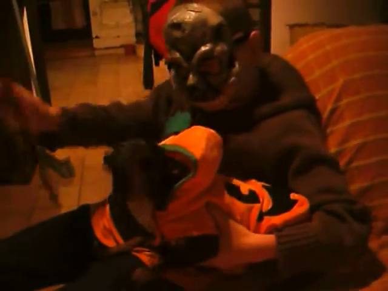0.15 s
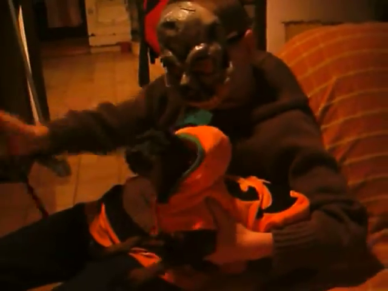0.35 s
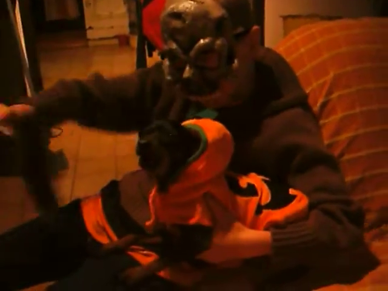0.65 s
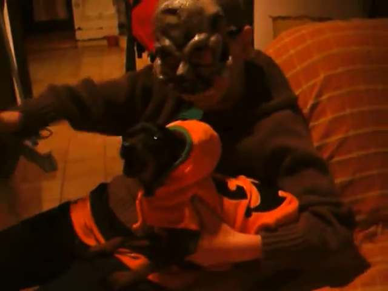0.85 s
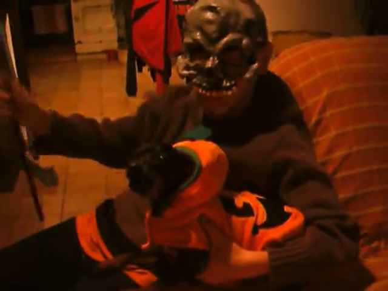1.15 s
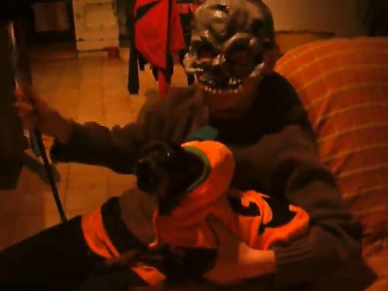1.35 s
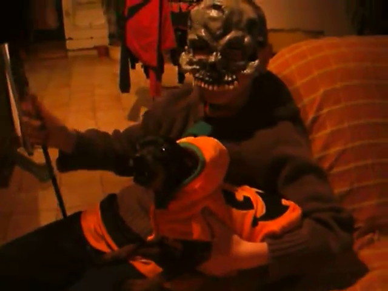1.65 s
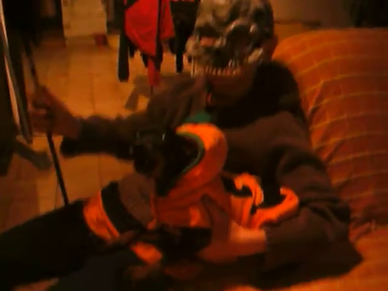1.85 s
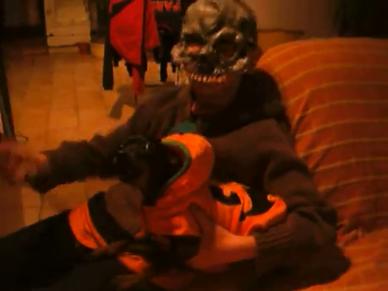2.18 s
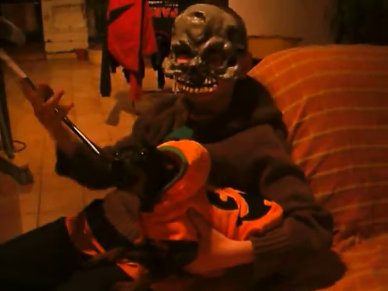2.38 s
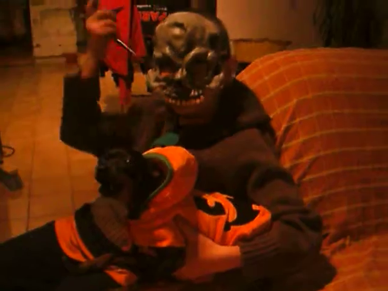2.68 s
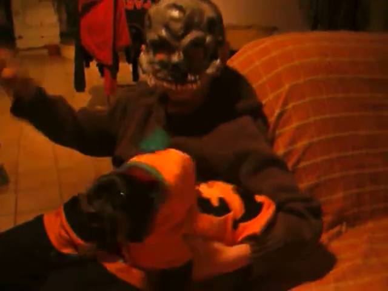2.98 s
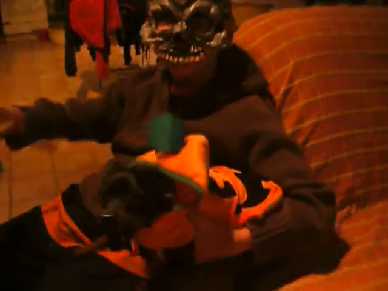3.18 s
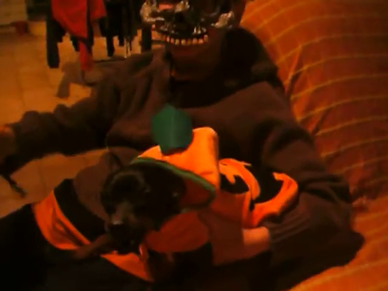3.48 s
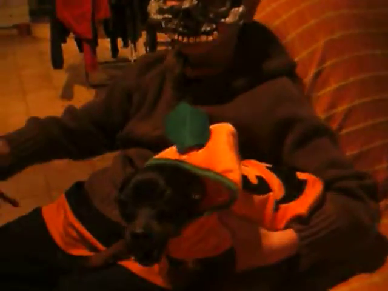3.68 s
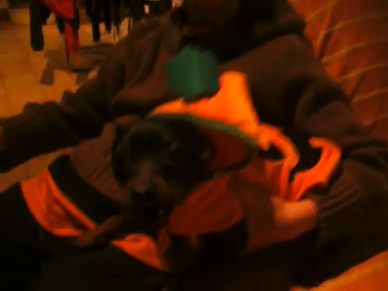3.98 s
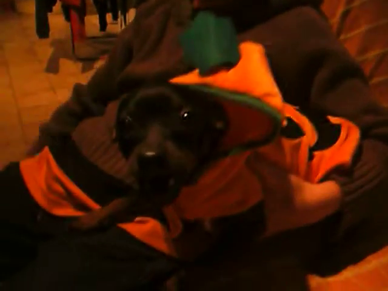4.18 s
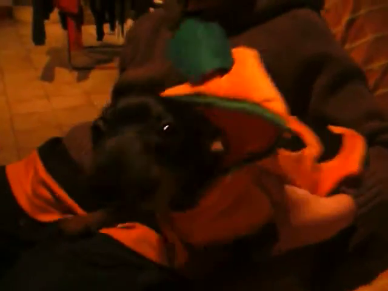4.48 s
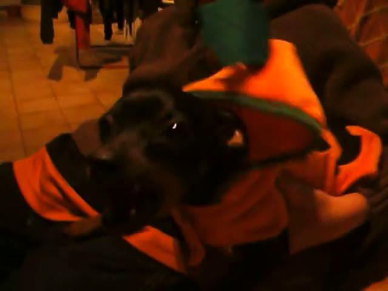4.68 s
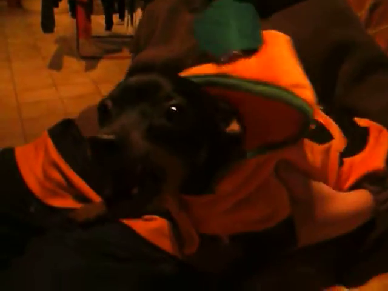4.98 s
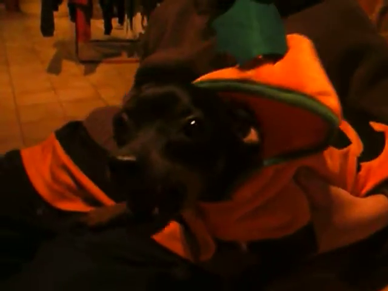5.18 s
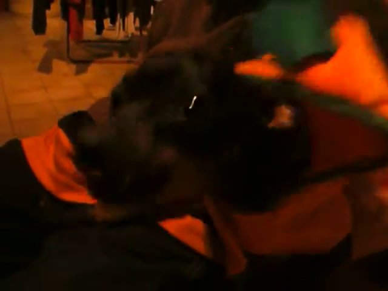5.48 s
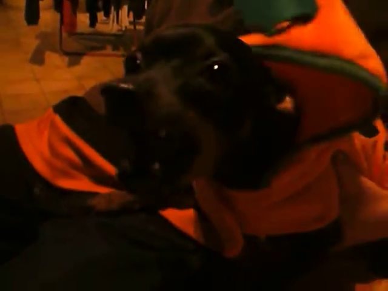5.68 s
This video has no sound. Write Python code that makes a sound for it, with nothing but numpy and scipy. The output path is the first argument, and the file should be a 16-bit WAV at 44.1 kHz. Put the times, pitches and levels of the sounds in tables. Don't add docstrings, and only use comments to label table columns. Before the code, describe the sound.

A small dog barks hoarsely, growls in long throbbing stretches and snarls on the in-breath, close and overdriven, in a hard tiled room with steady hiss.

```python
import sys
import numpy as np
from scipy import signal
from scipy.fft import rfft, irfft
from scipy.io import wavfile
from scipy.ndimage import uniform_filter1d

SR = 44100
rng = np.random.default_rng(int(sys.argv[2]) if len(sys.argv) > 2 else 0)


def nominal_scale(level):
    x = np.asarray(level, float) / 20
    return 10 ** x


def generate_wav(sig):
    pcm = np.round(np.clip(np.atleast_2d(sig).T, -1, 1) * 32767).astype(np.int16)
    wavfile.write(sys.argv[1], SR, pcm)


N = 257536
RATE = 8000


def evened(x):
    return x / np.sqrt(np.mean(x ** 2) + 1e-20)


def read(points, hz):
    f, value = np.transpose(points)
    return np.interp(np.log(hz + 1), np.log(f + 1), value)


# frequency in Hz, density in dB per Hz.
HUSH_SPECTRUM = [(59, -44), (100, -14), (141, -16), (721, -3), (2030, -3), (3740, -6), (4240, -15),
                 (5510, -45), (9330, -120)]


def hush(count):
    z = rfft(rng.standard_normal(count))
    shaped = irfft(z * nominal_scale(read(HUSH_SPECTRUM, np.fft.rfftfreq(count, 1 / RATE))), count)
    return nominal_scale(-18) * evened(shaped)


# time in seconds, frequency in Hz.
FOLD_RATE = [(0, 289.8), (.8, 238), (1.3, 244.4), (1.9, 262.2), (2.2, 295), (2.42, 289.7), (2.6, 250.9),
             (2.9, 261.5), (3.05, 294.5), (3.47, 294.9), (3.55, 245), (4.4, 240), (4.65, 215.1),
             (5.3, 214.8), (5.84, 230.5)]


def fold_rate(t):
    return np.interp(t, *np.transpose(FOLD_RATE))


def folds(count, hz, jitter, rough):
    wobble = evened(uniform_filter1d(rng.standard_normal(count), size=40))
    turns = np.cumsum(hz * (1 + jitter * wobble).clip(.2)) / RATE
    pulses = np.diff(np.floor(turns), prepend=0) * nominal_scale(3.0 * rng.standard_normal(count))
    puffs = (.35 + np.exp(-(turns % 1) / 0.27)) * rng.standard_normal(count)
    rough = np.clip(rough, 0, 1)
    return np.sqrt(1 - rough) * evened(pulses) + np.sqrt(rough) * evened(puffs)


def resonate(x, hz, width):
    turn = np.exp(2j * np.pi * np.cumsum(hz * np.ones(len(x))) / RATE)
    r = np.exp(-np.pi * 1.55 * width / RATE)
    smoothed = signal.lfilter([1], [1, -2 * r, r * r], x / turn)
    return evened((turn * smoothed).real)


def steadied(x, share):
    size = uniform_filter1d(abs(signal.hilbert(x)), size=24) + 0.17
    return evened(x / size ** np.clip(share, 0, 1))


# start in seconds, end in seconds, extra effort in dB.
BARK_PUSHES = [
    (0.085, 0.207, 8),
    (0.768, 0.837, 8.5),
    (2.802, 2.917, 5.5),
    (3.548, 3.63, 9.5),
    (4.354, 4.466, 5),
    (4.644, 4.714, 2.5),
    (5.327, 5.444, 9),
    (5.614, 5.682, 2.5),
]


def push(t, rise, fall):
    total = 0
    for start, end, db in BARK_PUSHES:
        total = total + db * np.clip((t - start) / rise, 0, 1) * np.clip((end - t) / fall + .5, 0, 1)
    return total


# time in seconds, swell in dB.
SWELLS = [(0.87, -2.7), (0.914, 0.7), (0.942, -1.2), (0.969, 3.5), (0.993, 2.5), (1.011, 2), (1.045, 2.5),
          (1.078, 4.0), (1.119, 4.5), (1.164, 4), (1.195, 1.5), (1.231, 2), (1.277, 0), (1.31, 1),
          (1.347, 2.5), (1.443, 7), (1.476, 2.5), (1.554, 3), (1.596, 4), (1.635, 3.5), (1.656, 5),
          (1.676, 1), (1.706, 4.5), (1.783, 5.5), (1.811, 2.7), (1.842, 3.5), (1.881, 0.3), (1.908, -0.2),
          (1.96, 5), (2.031, 5.5), (2.099, 2.5), (2.16, 0), (2.213, 1), (2.231, 3.0), (2.257, 1.5),
          (2.31, 3.0), (2.343, 2.5), (2.383, 3.5), (2.403, -1), (2.468, 3.5), (2.569, -2), (2.588, 3.0),
          (2.651, -1), (2.693, -7.1), (2.767, 0.5), (3.112, -0.5), (3.148, 2), (3.212, 1.5), (3.237, -0.2),
          (3.277, 2.5), (3.325, 3.0), (3.367, -9), (3.521, 4.5), (3.683, 6), (3.759, 0.9), (3.795, 4),
          (3.87, 4.5), (3.905, -0.5), (4.01, 4), (4.03, 1), (4.062, 4.5), (4.08, 0), (4.098, 1), (4.142, 3),
          (4.24, 2.1), (4.29, 2.5), (4.331, 2.4), (4.791, 0), (4.838, 2), (4.888, 2.5), (4.927, 3.5),
          (4.982, 0), (5.014, 2.5), (5.053, 1), (5.071, 2.5), (5.113, 1.5), (5.169, 3.5), (5.196, 4),
          (5.22, 3.5), (5.764, 0), (5.782, 3.0), (5.802, 1.8)]
# time in seconds, depth in dB.
SHUTS = [(0.928, 10.5), (1.027, 11), (1.06, 8.5), (1.103, 11), (1.137, 6), (1.218, 4), (1.254, 10),
         (1.333, 11.5), (1.421, 4), (1.544, 4.5), (1.568, 5.5), (1.623, 8.5), (1.684, 9), (1.752, 3),
         (1.795, 10), (1.828, 6), (1.929, 3.5), (2.045, 6.5), (2.146, 9), (2.197, 6.5), (2.37, 6),
         (2.422, 2.5), (2.535, 7), (2.6, 9), (2.669, 0), (2.705, 9.5), (2.779, 8), (3.191, 9.5), (3.251, 8),
         (3.535, 13), (3.736, 6.5), (3.77, 5), (3.852, 6), (3.93, 7.5), (3.996, 6), (4.127, 10),
         (4.194, 6.5), (4.266, 8), (4.31, 8), (5.133, 5.5)]


def palate(t, dip_db, width, shut_width):
    s, swell_db = np.transpose(SWELLS)
    swells = (swell_db + dip_db) * np.exp(-((t[:, None] - s) / width) ** 2 / 2)
    s, depth_db = np.transpose(SHUTS)
    notches = 1.3 * depth_db * np.exp(-((t[:, None] - s) / shut_width) ** 2 / 2)
    return swells.max(axis=1) - dip_db - notches.max(axis=1)


def voice(rows, modes, fixed, chest_db, jitter, rough, steady, dip_db, spill_db, usual_db):
    s, effort_db, *throat, upper_db = np.transpose(rows)
    t = np.arange(s[0], s[-1], 1 / RATE)
    hz = fold_rate(t)
    pushed = push(t, rise=.004, fall=0.042)
    drive = folds(len(t), hz, jitter, rough)
    upper = nominal_scale(np.interp(t, s, upper_db) - usual_db)
    moving = [nominal_scale(db) * resonate(drive, np.interp(t, s, f), w) for f, (w, db) in zip(throat, modes)]
    still = sum(nominal_scale(db) * resonate(drive, f, w) * (upper if f > 1500 else 1) for f, w, db in fixed)
    chest = sum(nominal_scale(db) * resonate(drive, (k + 1) * hz, 32 * np.sqrt(k + 1))
                for k, db in enumerate(chest_db))
    spill = nominal_scale(spill_db + 0.65 * pushed) * resonate(drive, 2200, 1700) * upper
    swell_db = palate(t, dip_db, width=.008, shut_width=0.0042) * (pushed < 1)
    sound = steadied(moving[0], steady) - upper * sum(moving[1:]) + still + spill + chest / nominal_scale(pushed)
    edge = np.clip(np.minimum((t - s[0]) / 0.0042, (s[-1] - t) / 0.017), 0, 1)
    return s[0], sound * nominal_scale(np.interp(t, s, effort_db) + pushed + swell_db) * edge


def add(mix, s, sound):
    part = mix[round(s * RATE):][:len(sound)]
    part += sound[:len(part)]


# time in seconds, effort in dB, throat resonances 1 and 2 in Hz,
# upper throat in dB.
SNARL_BREATHS = [
    [(0.0, -13.5, 1126, 2645, -5), (0.028, -18, 1104, 2730, -3), (0.07, -33.5, 1088, 2635, -23),
     (0.08, -2.5, 1116, 2590, -11.5)],
    [(0.52, -27, 969, 2480, -3), (0.544, -22, 943, 2430, -2.5), (0.558, -22, 957, 2470, -16),
     (0.575, -35, 963, 2520, -2.5)],
    [(3.056, -23.5, 1202, 2600, -1), (3.102, -16, 1201, 2510, -0.5), (3.178, -17, 1132, 2674, -3),
     (3.29, -17.5, 1191, 2632, -3), (3.396, -13, 1083, 2655, -3), (3.458, -28, 1073, 2680, 3),
     (3.475, -35, 1107, 2720, 2)],
    [(4.657, -14.5, 1216, 2570, 0), (4.667, -7, 1160, 2629, -1), (4.773, -16, 1143, 2514, -3.5),
     (5.087, -16, 1114, 2560, -4.5), (5.111, -12, 1122, 2510, -6), (5.133, -17, 1128, 2534, -3),
     (5.199, -15, 1163, 2556, -5), (5.285, -21.5, 1093, 2544, -8), (5.31, -52, 1113, 2520, -2)],
    [(5.612, -16.5, 1208, 2612, 0), (5.648, -8.5, 1204, 2608, -7), (5.736, -16, 1098, 2502, -3.5),
     (5.778, -11.5, 1101, 2600, -4.5), (5.84, -16.5, 1152, 2655, 1)],
]
# width in Hz, level in dB.
SNARL_THROAT = [(95, -15.5), (190, -2.5)]
# frequency in Hz, width in Hz, level in dB.
SNARL_STILL = [(700, 110, -18.5), (1574, 200, -16), (3091, 170, -12.5), (3490, 140, -10.5), (3830, 160, -3)]


def snarls(mix):
    for rows in SNARL_BREATHS:
        add(mix, *voice(rows, SNARL_THROAT, SNARL_STILL, chest_db=[-22, -28], jitter=0.28, rough=0.82,
                        steady=0.47, dip_db=2.0, spill_db=-12.5, usual_db=-1.5))


# frequency in Hz, 60 dB decay time in seconds.
ROOM_DECAY = [(200, 0.4), (600, 0.26), (1200, 0.56), (2000, 0.68), (3200, 0.45), (4400, 0.92)]


def room(x):
    taps = np.zeros(RATE)
    count = RATE // 4 - 11
    places = np.arange(40, RATE - 4, 4) + rng.integers(0, 4, count)
    taps[places] = rng.choice([-1., 1.], count)
    hz, t, z = signal.stft(taps, RATE, nperseg=64)
    decay = nominal_scale(-60 * t / read(ROOM_DECAY, hz)[:, None])
    tail = signal.istft(z * decay, RATE, nperseg=64)[1]
    return signal.fftconvolve(x, tail / np.linalg.norm(tail))[:len(x)]


# time in seconds, effort in dB,
# throat resonances 1 to 3 in Hz, upper throat in dB.
GROWL_BREATHS = [
    [(0.084, -6.5, 1098, 1942, 2907, -3), (0.124, -7.5, 1138, 1883, 2853, -5),
     (0.206, -14.5, 1053, 1910, 2843, -2), (0.225, -17, 1050, 1972, 2925, 0)],
    [(0.77, -12.5, 960, 1800, 2884, -6.5), (0.81, -7, 974, 1725, 2933, -6.5),
     (0.9, -19, 954, 1690, 2670, -8.5), (1.01, -10, 918, 1675, 2672, -15.5),
     (1.03, -19.5, 890, 1640, 2680, -16), (1.05, -11, 930, 1708, 2666, -27.5),
     (1.09, -15.5, 890.7, 1618, 2665, -18.5), (1.3, -11, 926, 1717, 2660, -13.5),
     (1.43, -14, 961.5, 1756, 2704, -8.5), (1.99, -12.5, 962, 1774, 2878, -12),
     (2.16, -13, 1013, 1796, 2905, -10), (2.49, -12, 981.5, 1748, 3046, -18.5),
     (2.54, -14.5, 980, 1710, 3020, -10.5), (2.57, -8.5, 943, 1760, 2946, -20.5),
     (2.6, -17.5, 974, 1774, 3000, -7.5), (2.61, -11.5, 950, 1820, 2870, -27.5),
     (2.72, -15.5, 975.6, 1796, 2933, -23.5), (2.85, -7, 1046, 1887, 2918, -3.5),
     (2.92, -14, 1129, 1860, 2797, -2.5)],
    [(2.93, -18.5, 1063, 1777, 2730, 4.5), (2.958, -17.5, 1020, 1775, 2690, -2.5),
     (3.0, -32, 1060, 1783, 2760, -1)],
    [(3.508, -9, 1010, 2015, 2960, -1.5), (3.524, -10, 1040, 1927, 2914, -7),
     (3.612, -10.5, 1080, 2014, 3000, -4), (3.708, -14.5, 1055, 1967, 3000, -8.5),
     (3.786, -13, 1040, 1939, 2986, -7.5), (4.15, -12.5, 1007, 1943, 2940, -9.5),
     (4.19, -18.5, 990, 1920, 3060, -7), (4.28, -7.5, 1053, 1923, 2979, -12),
     (4.444, -14.5, 1139, 1996, 2860, 0), (4.475, -20, 1112, 1950, 2780, 4.5)],
    [(4.485, -14.5, 982, 1893, 2630, -1), (4.503, -17, 1014, 1920, 2650, 1),
     (4.543, -15.5, 1013, 1950, 2720, -1.5), (4.555, -30, 1010, 1940, 2720, -3.5)],
    [(5.332, -15.5, 1111, 2049, 2883, -1), (5.352, -5.5, 1119, 2029, 2830, -4),
     (5.452, -7, 1041, 1890, 2691, -4.5), (5.5, -17, 1058, 1930, 2740, -2.5)],
]
# width in Hz, level in dB.
GROWL_THROAT = [(60, -2), (85, -9.5), (110, -15)]
# frequency in Hz, width in Hz, level in dB.
GROWL_NOSE = [(1273.5, 90, -19), (3601, 140, -23)]


def growls(mix):
    for rows in GROWL_BREATHS:
        add(mix, *voice(rows, GROWL_THROAT, GROWL_NOSE, chest_db=[-22, -29, -15], jitter=.12, rough=.55,
                        steady=0.62, dip_db=3.5, spill_db=-23, usual_db=-7))


# time in seconds, level in dB.
SNORT_LEVEL = [
    (0.5, -41),
    (0.518, -38),
    (0.522, -31.5),
    (0.546, -27.5),
    (0.564, -43),
    (0.74, -38),
]


def snort():
    s, level_db = np.transpose(SNORT_LEVEL)
    t = np.arange(s[0], s[-1], 1 / RATE)
    air = rng.standard_normal(len(t))
    hiss = resonate(air, 3000, 1900) + nominal_scale(-8.5) * resonate(air, 3500, 250)
    return s[0], nominal_scale(np.interp(t, s, level_db) - 13.5) * hiss


def scene():
    dog = np.zeros(N * RATE // SR + 2)
    snarls(dog)
    growls(dog)
    add(dog, *snort())
    air = dog + nominal_scale(-13) * room(dog) + hush(len(dog))
    return signal.resample_poly(air, 441, 80)[None, :N]


def band_limit(x):
    return signal.sosfilt(signal.butter(12, 16550, fs=SR, output="sos"), x)


def record(dry):
    rail, top = .707, .63
    x = signal.resample_poly(dry[0], 80, 441)
    x = signal.sosfilt(signal.butter(2, 190, "high", fs=RATE, output="sos"), x)
    last_good = np.maximum.accumulate(np.where(x < top, np.arange(len(x)), 0))
    x = np.maximum(x[last_good], -rail) - .0015
    smooth = signal.firwin(441 * 24 + 1, 3900, window=("kaiser", 8), fs=RATE * 441)
    x = signal.resample_poly(x, 441, 80, window=smooth)[:N]
    return band_limit(np.clip(x, -rail, rail)[None])


dry = scene()
out = record(dry)
generate_wav(out)
```